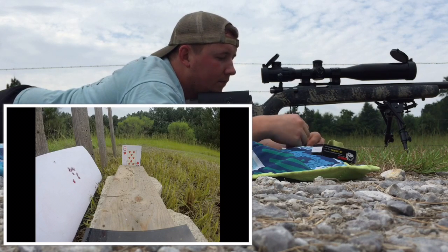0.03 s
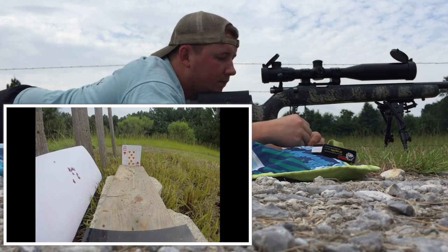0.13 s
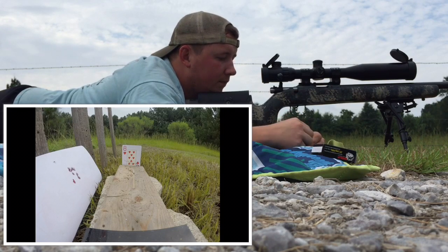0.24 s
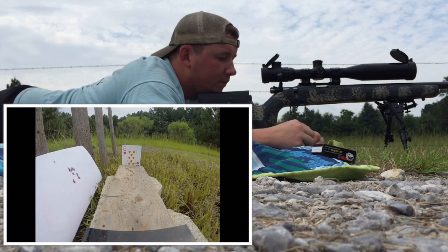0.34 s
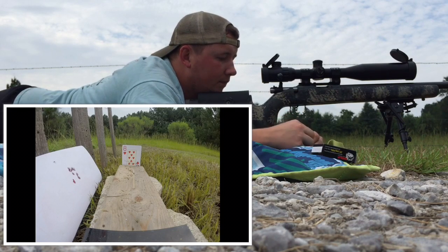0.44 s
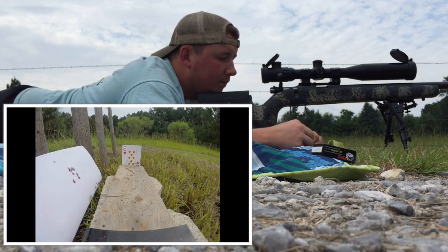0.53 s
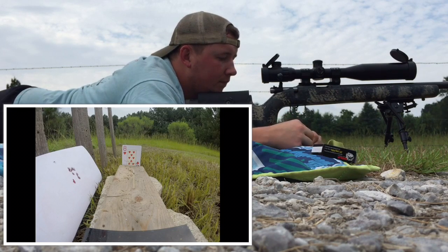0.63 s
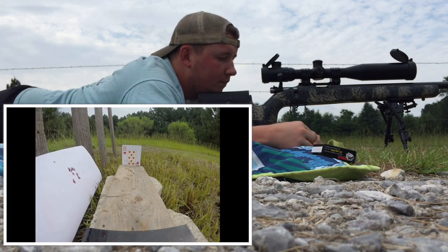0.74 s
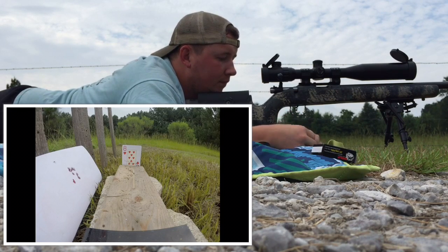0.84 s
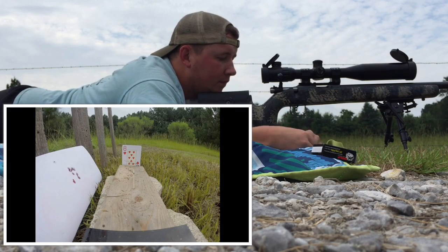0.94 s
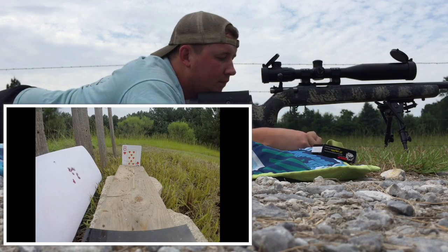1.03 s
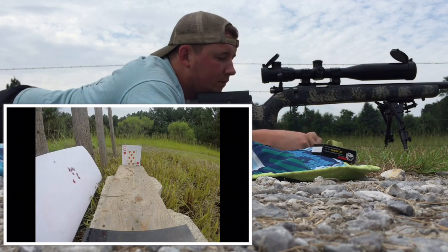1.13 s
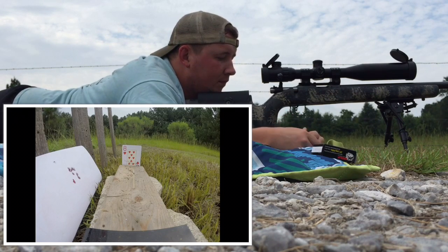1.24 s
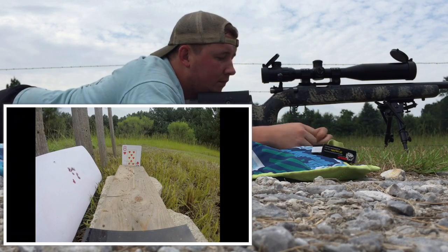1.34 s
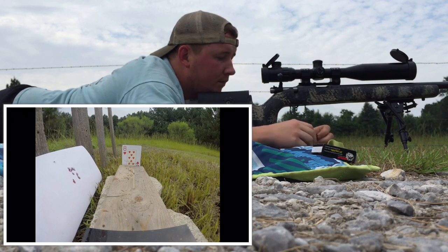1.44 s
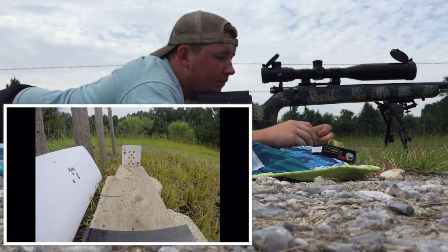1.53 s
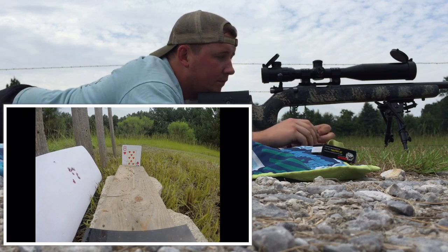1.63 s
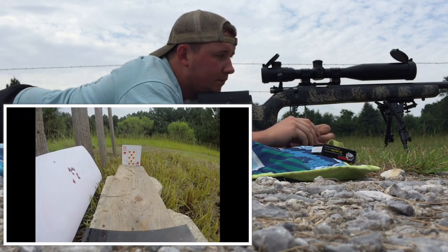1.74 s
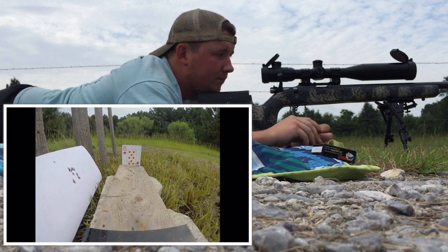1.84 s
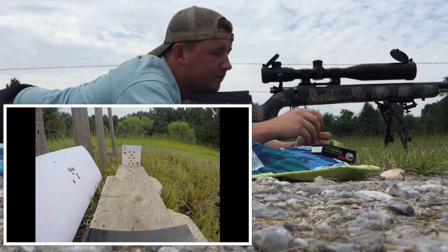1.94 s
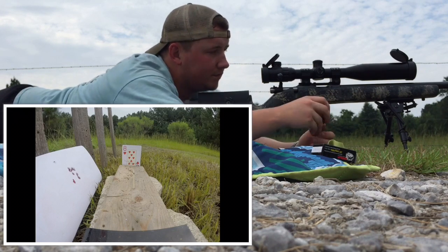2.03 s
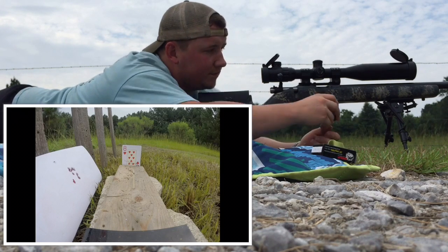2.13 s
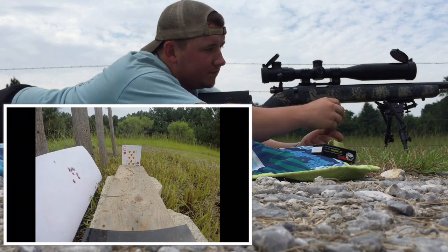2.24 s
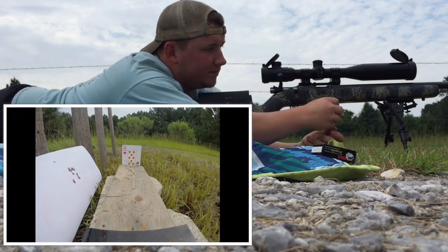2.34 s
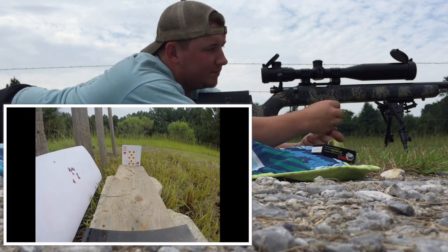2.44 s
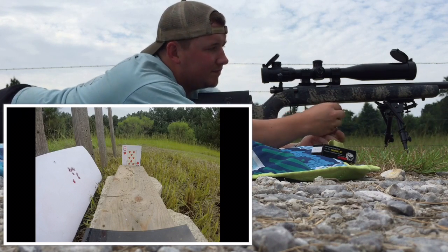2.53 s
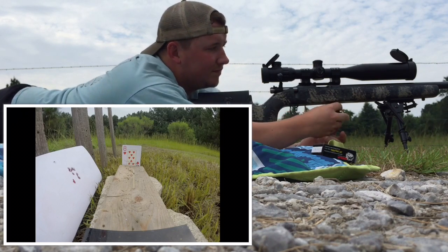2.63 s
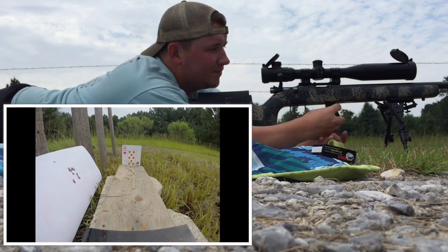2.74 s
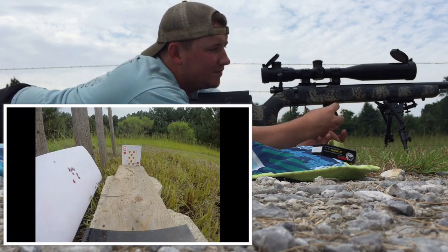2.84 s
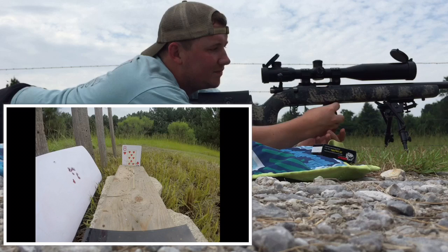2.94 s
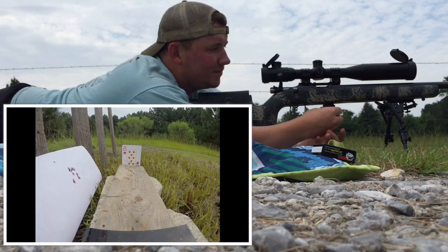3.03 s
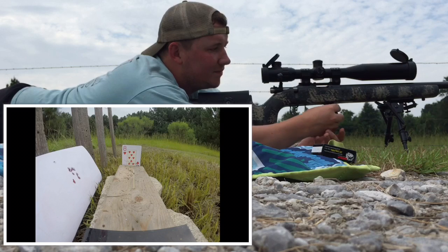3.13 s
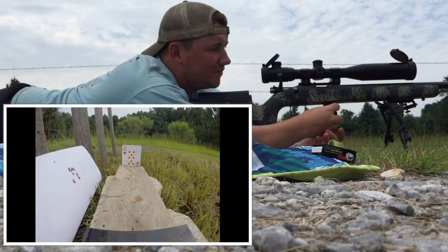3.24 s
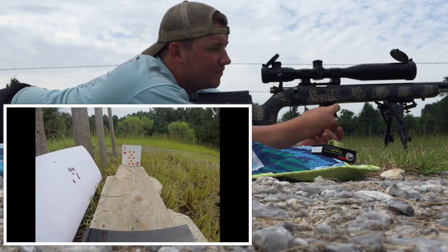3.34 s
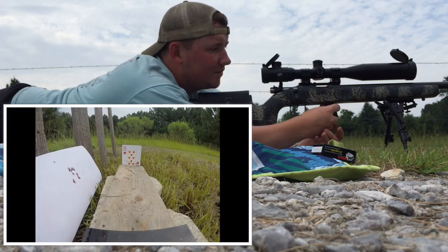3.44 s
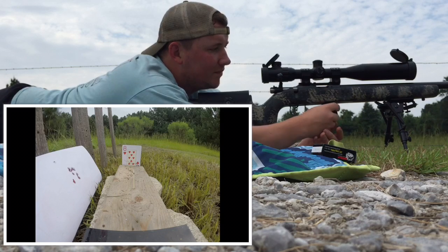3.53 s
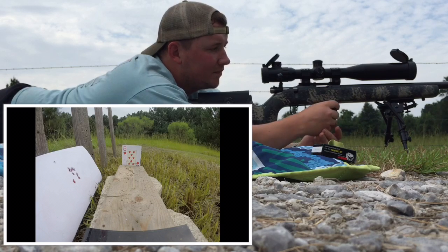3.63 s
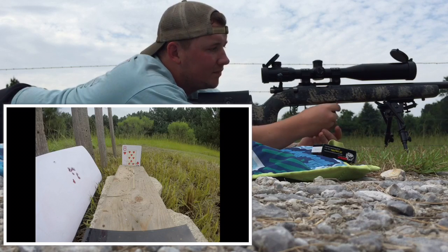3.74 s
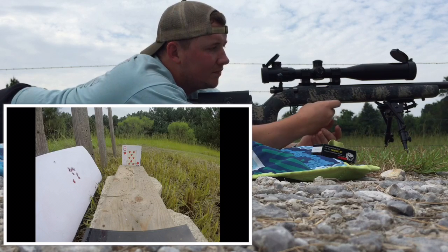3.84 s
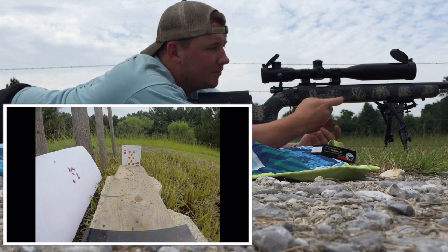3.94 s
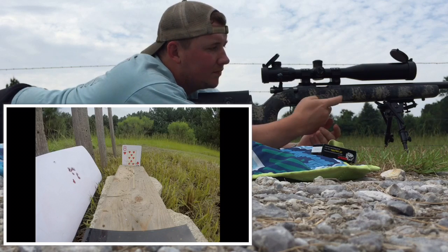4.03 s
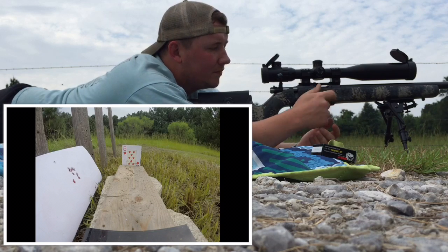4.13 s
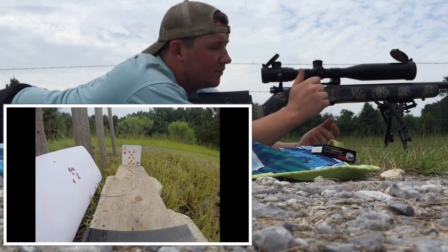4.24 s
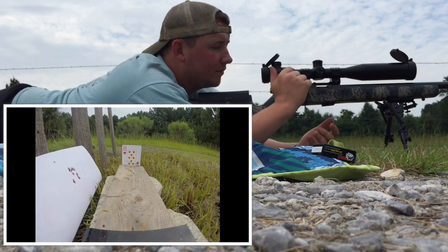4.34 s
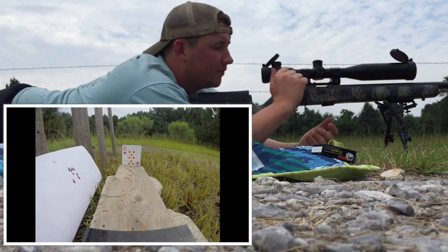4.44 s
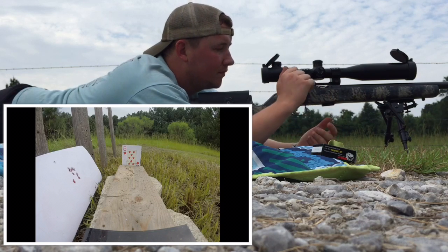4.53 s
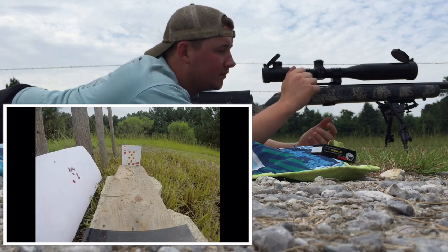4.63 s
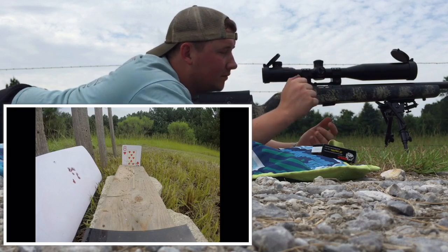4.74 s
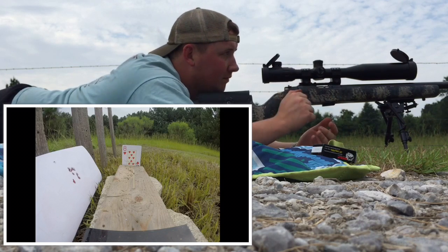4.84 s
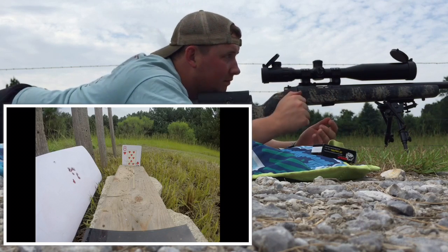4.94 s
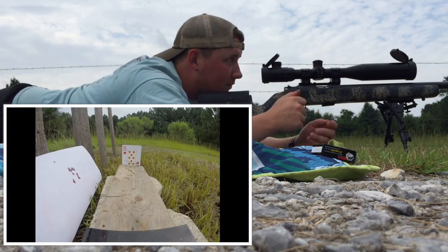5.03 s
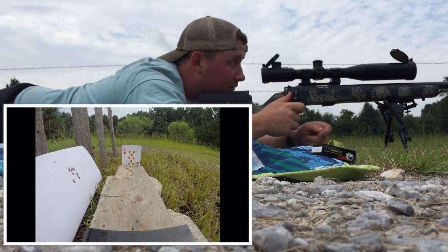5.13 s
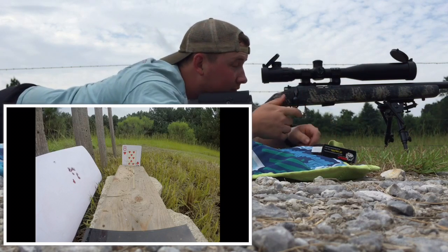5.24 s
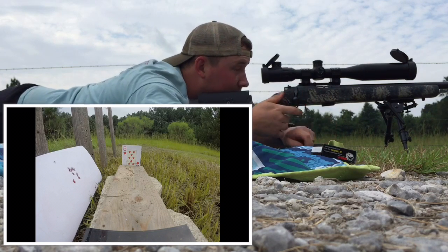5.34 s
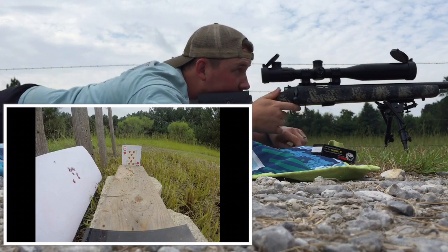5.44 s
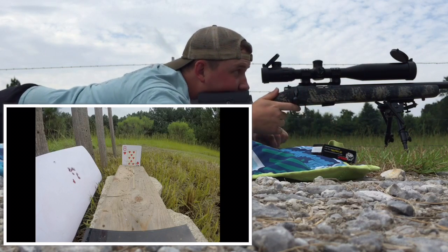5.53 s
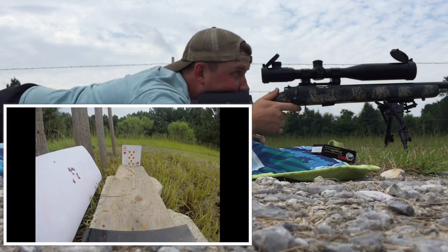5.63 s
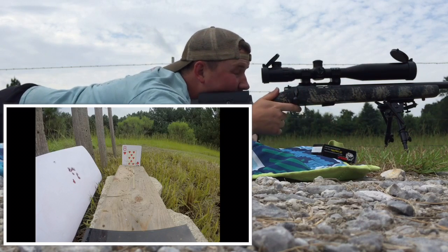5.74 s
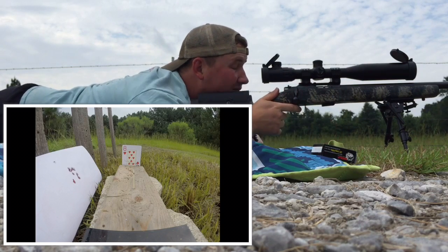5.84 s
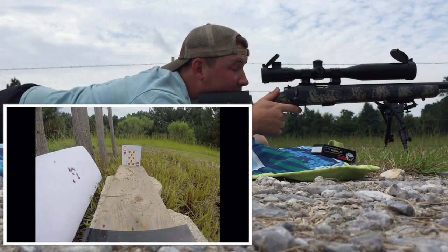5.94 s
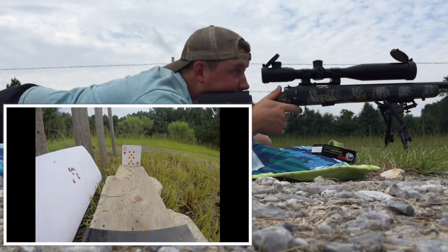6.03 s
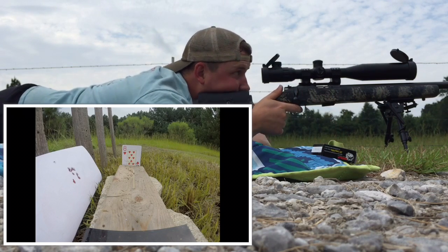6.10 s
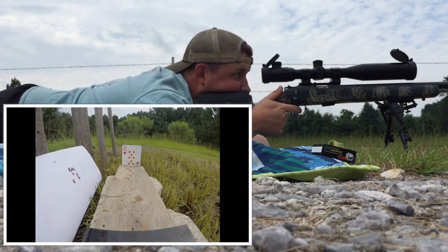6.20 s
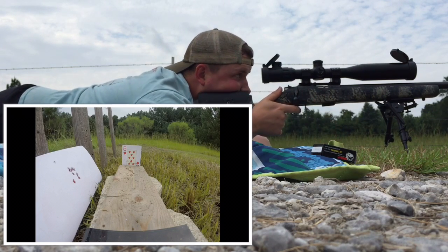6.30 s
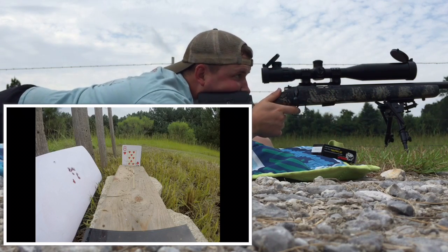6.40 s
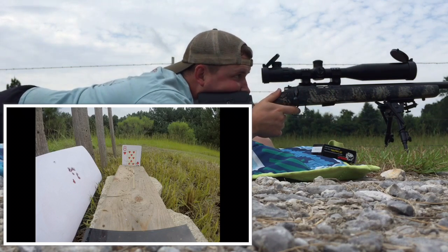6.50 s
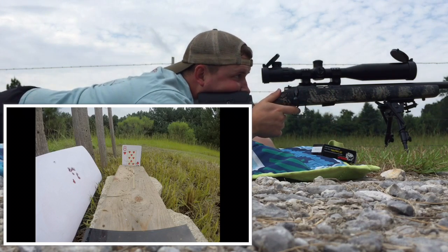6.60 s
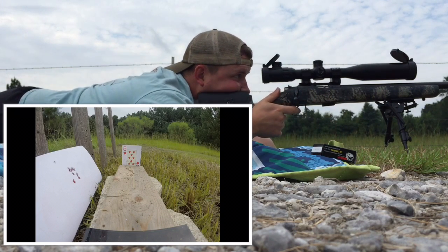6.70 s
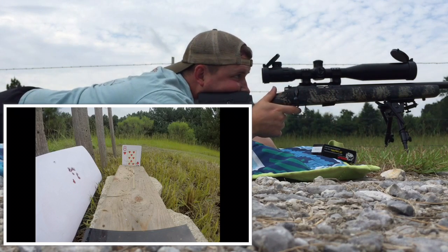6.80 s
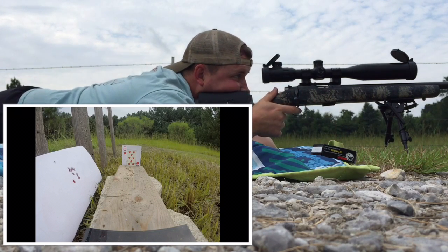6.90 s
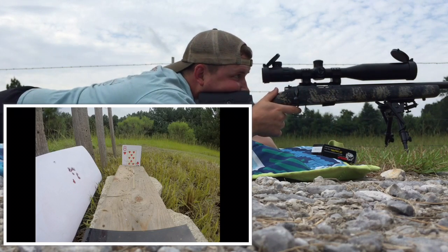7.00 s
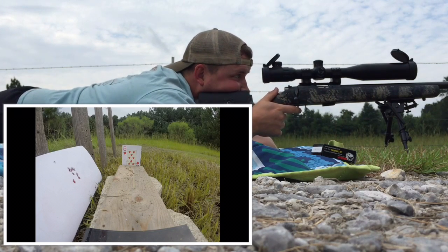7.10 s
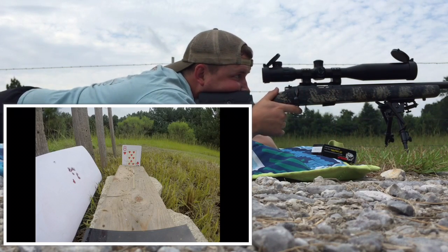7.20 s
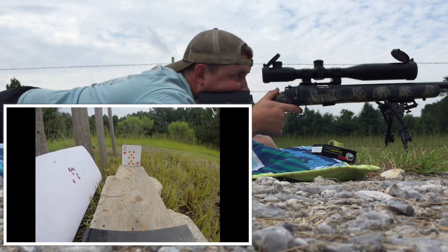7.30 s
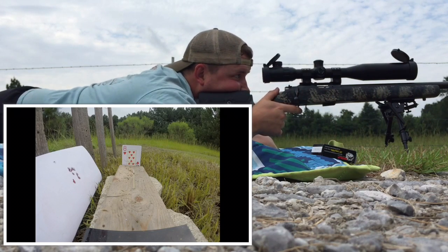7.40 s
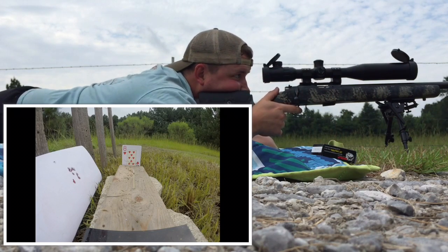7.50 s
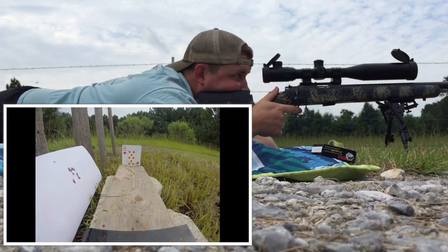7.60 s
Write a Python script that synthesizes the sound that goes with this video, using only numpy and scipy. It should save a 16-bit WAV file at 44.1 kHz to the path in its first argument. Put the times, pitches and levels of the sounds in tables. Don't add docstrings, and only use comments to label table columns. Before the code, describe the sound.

A quiet open field: low, lumpy wind rumble, soft hiss, a thin high insect chorus and faint sleeve rustle throughout. Tiny handling clicks come at about 0.9 and 1.15 s. A nearer bird gives a thin, rising whistle at 1.5 s, and a far bird chirps around 1.8 s. From 2.4 to 3.3 s light steel ticks and dull taps mark a cartridge being nudged in. At 3.5 s the whistle returns with a faint low hoot and quick warbling. Catches snap at 3.7, 3.9 and, very bright, 4.04 s; the warble thickens, with a climbing trill near 4.5 s. At 4.6 s the bolt scrapes and slams with a loud, hard clack at 4.67 s, rattles at 4.83 s and locks with a woody steel clunk at 4.95 s. A last whistle comes at 5.3 s with small knocks, then gentle mat rubbing and calm ambience until 7.6 s.

```python
import sys
import numpy as np
from scipy import signal
from scipy.io import wavfile
from scipy.ndimage import uniform_filter1d

SR = 44100
rng = np.random.default_rng(int(sys.argv[2]) if len(sys.argv) > 2 else 0)


def rack_gain(trim_db):
    fader = np.asarray(trim_db, float)
    return 10 ** (fader / 20)


def wav_out(sig):
    wavfile.write(sys.argv[1], SR, np.round(np.clip(np.atleast_2d(sig).T, -1, 1) * 32767).astype(np.int16))


N = 337799


def evened(x):
    return x / np.sqrt(np.mean(x ** 2) + 1e-20)


def add(mix, s, sound):
    part = mix[round(s * SR):][:len(sound)]
    part += sound[:len(part)]


def resonate(x, hz, width):
    turn = np.exp(2j * np.pi * np.cumsum(hz * np.ones(len(x))) / SR)
    r = np.exp(-np.pi * width / SR)
    return 2 * (turn * signal.lfilter([1 - r], [1, -r], x * turn.conj())).real


def noise(spectrum, patchy_db, size):
    frames, hz = 4 * N // size + 5, np.fft.rfftfreq(size, 1 / SR)
    real, imaginary, patches = rng.standard_normal((frames, len(hz), 3)).T
    patches = uniform_filter1d(patches, size=8, axis=0)
    patches = evened(uniform_filter1d(patches, size=6, axis=1))
    f, db = np.transpose(spectrum)
    colour_db = np.interp(np.log(hz + 1), np.log(f), db, left=-90, right=-90)
    z = (real + 1j * imaginary) * rack_gain(colour_db[:, None] + patchy_db * patches)
    return evened(signal.istft(z, nperseg=size, noverlap=3 * size // 4)[1][:N])


def rifle():
    return contacts() + rings() + slams() + slides() + pings()


def contacts():
    # (time [s], peak level [dB], centre [Hz], rattle t60 [s])
    fumbles = [(0.865, -56, 1800, 0.056), (1.1635, -52, 1720, 0.017), (2.483, -56, 1290, 0.063),
               (2.640, -52, 1290, 0.068), (2.959, -63, 1200, .036), (2.984, -62, 1250, .04),
               (3.306, -51, 1390, .067), (4.571, -50, 3400, .018), (4.659, -33, 1300, 0.012),
               (5.355, -48, 1670, 0.011)]
    ticks = [(2.438, -43.5, 1290, .029), (2.838, -58, 1340, .02), (2.860, -39.5, 4700, 0.023),
             (2.860, -43, 1600, .022), (2.870, -47, 5300, .015), (3.031, -47.5, 2000, .022),
             (3.876, -34, 2900, .015), (3.941, -40, 1500, .05), (3.954, -41, 2500, .013),
             (4.629, -38.5, 3580, .033), (4.798, -43, 2200, .019), (5.093, -72, 2600, .01),
             (5.185, -71, 2400, .01)]
    latches = [(3.684, -32.5, 1900, .01), (3.938, -21.5, 1800, .0065), (4.0376, -29, 2790, 0.0041),
               (4.6147, -28.5, 5400, 0.0046), (4.9483, -31, 4700, 0.0091)]
    snaps = [(1.150, -60, 3000, 0.024), (1.1632, -48, 4700, 0.019), (1.909, -65, 5000, .01),
             (4.0376, -26, 5600, 0.0062), (4.6152, -36.5, 5600, .003), (4.66, -42.5, 5600, .006),
             (4.702, -60, 5800, .008)]
    blows = [(4.637, -21.5, 3500, 0.0087), (4.6668, -20, 2268, .0025), (4.6680, -26, 2250, .006),
             (4.6692, -20, 5600, .012), (4.9482, -33, 4000, 0.016)]
    chatter = [(4.606, -46, 2500, 0.035), (4.633, -31.5, 3300, .025), (4.647, -39.5, 4700, 0.038),
               (4.655, -35, 3000, .01), (4.675, -33, 1300, 0.022), (4.788, -69, 1300, 0.033),
               (4.8344, -33, 1820, 0.014)]
    knocks = [(2.049, -51.5, 1710, 0.0098), (2.789, -52, 1100, 0.033), (3.184, -66, 1490, .017),
              (3.387, -57.5, 1152, 0.01), (3.932, -52, 1560, 0.015), (4.930, -48, 2200, 0.026),
              (4.9484, -32, 1260, 0.0069), (4.958, -40.5, 1342, 0.036), (5.263, -56, 607, 0.016),
              (5.310, -50, 1100, 0.019)]
    # (contacts, stock thud [dB], treble [dB])
    kinds = [(fumbles, -30.5, -66.5), (ticks, -20.5, -28), (latches, -37, -27), (snaps, -22.5, 3),
             (blows, -39.5, -9), (chatter, -11.5, -12), (knocks, -4, -23.5)]
    out = np.zeros(N)
    for events, thud_db, treble_db in kinds:
        for s, db, hz, t60 in events:
            add(out, s, click(db, hz, thud_db, treble_db, t60))
    return out


def click(db, centre_hz, thud_db, treble_db, t60):
    # (frequency [Hz], width [Hz], level [dB])
    action = [(994, 260, -6.5), (1290, 195, 1.5), (1800, 280, -0.5), (2300, 370, -1.5), (2900, 580, -1),
              (3500, 300, -1), (3960, 730, -3), (4700, 290, -2), (5600, 910, 3.5)]
    # (frequency [Hz], width [Hz], level [dB])
    stock = [(305.2, 480, -7.5), (440, 99, 0), (564, 240, -1.5), (620, 45, 1.5), (717, 56, -7)]
    # (frequency [Hz], width [Hz], level [dB])
    small_parts = [(7920, 1200, -0.5), (9750, 3400, 4), (11146, 550, 0), (13000, 1600, 3),
                   (15250, 660, 1.5)]
    t = np.arange(2800) / SR
    rattle = rng.standard_normal(len(t)) * rack_gain(-60 * t / max(t60, .002)) * (1 - np.exp(-t / (.025 * t60)))
    rattle[0] = -np.sqrt(np.sum(rattle ** 2)) * rack_gain(1.0 - 360 * t60)
    focus = 4 + .015 * min(treble_db, 0) ** 2
    body = ring_modes(rattle, action, skirt=4.2, weight_db=lambda hz: -focus * np.log2(hz / centre_hz) ** 2)
    thud = ring_modes(rattle, stock, skirt=7.13, weight_db=lambda hz: 0)
    treble = ring_modes(rattle, small_parts, skirt=3, weight_db=lambda hz: 0)
    return rack_gain(db) * (body + rack_gain(thud_db + 1.5) * thud + rack_gain(treble_db + 3.5) * treble)


def ring_modes(drive, modes, skirt, weight_db):
    y = np.zeros(len(drive))
    for k, (hz, width, db) in enumerate(modes):
        mode = resonate(resonate(drive, hz, width), hz, skirt * width)
        y += (-1) ** k * rack_gain(db + weight_db(hz)) * evened(mode)
    return y / abs(y).max()


def rings():
    # (time [s], level [dB], frequency [Hz], t60 [s])
    long_rings = [(2.436, -45, 1320, 0.093), (2.862, -46.5, 1370, 0.076), (2.954, -56, 1470, 0.26),
                  (2.956, -52.5, 1240, 0.08), (1.150, -61.5, 1080, 0.13), (3.685, -44, 1470, 0.13),
                  (3.957, -50, 1480, 0.23), (4.039, -45, 5170, 0.1), (4.038, -46, 750, .06),
                  (4.669, -35, 610, 0.081), (4.669, -29, 750, 0.079), (3.942, -41.5, 2900, 0.048),
                  (4.67, -40, 1490, 0.18), (4.836, -57, 1460, 0.2), (4.949, -52, 5195, 0.073),
                  (1.1635, -39.5, 11000, 0.015), (4.9493, -19, 580, 0.015), (4.945, -51, 62, 0.35),
                  (4.0377, -21, 2950, 0.0135)]
    out, t = np.zeros(N), np.arange(12000) / SR
    for s, db, hz, t60 in long_rings:
        flutter = rack_gain(2.8 * evened(uniform_filter1d(rng.standard_normal(len(t)), size=200)))
        decay = rack_gain(db - 60 * t / t60) * (1 - np.exp(-t / .001))
        add(out, s, flutter * decay * np.sin(2 * np.pi * hz * t))
    return out


def slams():
    # (time [s], level [dB], tilt [dB per octave])
    strikes = [
        (4.6666, -30, 0),
        (4.8345, -44.5, 4),
        (4.949, -36, -8.5),
    ]
    out = np.zeros(N)
    for s, db, tilt_db in strikes:
        add(out, s, slam(db, tilt_db))
    return out


def slam(db, tilt_db):
    # (frequency [Hz], level [dB], t60 [s])
    bolt = [(1270, -6, 0.031), (1770, -1.5, 0.0277), (1840, -4, .035), (2290, -5.5, 0.028),
            (2570, 0.5, .02), (3100, -10.5, .04), (3950, -10.5, 0.043), (5520, -9, .02)]
    t = np.arange(3000) / SR
    detune, phase = rng.random((2, len(bolt)))
    modes = np.zeros(len(t))
    for (hz, mode_db, t60), d, p in zip(bolt, detune, phase):
        decay = rack_gain(mode_db + tilt_db * np.log2(hz / 1300) - 60 * t / t60)
        modes += decay * np.sin(2 * np.pi * (hz * (.99 + .02 * d) * t + p))
    return rack_gain(db) * modes * (1 - np.exp(-t / .0004))


def slides():
    # (loudest time [s], rise [s], fall [s], scrape level [dB])
    strokes = [(3.876, 0.054, 0.023, -45), (3.939, 0.0054, 0.037, -35), (4.639, 0.046, 0.033, -35),
               (4.668, .014, .018, -29), (4.800, 0.0075, 0.0092, -34)]
    # (frequency [Hz], level [dB per Hz])
    scrape = [(180, -39), (300, -3.5), (2520, 0.5), (2880, -4.5), (3520, -5.5), (4020, -11.5), (5610, -6.5),
              (16000, -27)]
    depth_db = 21.5
    out, grit = np.zeros(N), noise(scrape, patchy_db=2.0, size=128)
    for s, rise, fall, db in strokes:
        t = np.arange(s - rise, s + fall, 1 / SR)
        level_db = np.interp(t, [s - rise, s, s + fall], [db - depth_db, db, db - depth_db])
        part = grit[round(t[0] * SR):][:len(t)]
        add(out, t[0], rack_gain(level_db - 12.0) * part * signal.windows.tukey(len(t), .2))
    return out


def pings():
    # (time [s], level [dB], frequency [Hz], t60 [s])
    contact_modes = [(4.6669, -18, 3200, .003), (4.668, -10, 2300, .009), (4.6678, -16, 1900, .016),
                     (4.668, -17, 2590, .009), (4.6672, -25, 1625, .03), (4.669, -19, 5850, .012),
                     (4.6675, -20, 6370, .012), (4.667, -24, 4760, .01), (4.6672, -26, 7400, .015),
                     (4.67, -25, 3930, .02), (4.6685, -24, 1314, .045), (4.67, -28, 5500, .022),
                     (4.6597, -34, 9700, .008), (4.6597, -38, 13800, .006), (4.6755, -36, 8540, .015),
                     (4.6555, -42, 9500, .005), (4.9488, -30, 436, .05), (4.9494, -29, 614, .045),
                     (4.9496, -32, 743, .055), (4.9484, -18, 1249, .025), (4.9487, -24, 1760, .02),
                     (4.9495, -33, 2550, .022), (4.9484, -20, 4660, .007), (4.9484, -26, 6000, .01),
                     (4.95, -35, 5500, .02), (4.9495, -34, 4020, .02), (4.0376, -13, 15200, .006),
                     (4.0377, -19, 13430, .01), (4.0377, -20, 9740, .008), (4.0377, -28, 11400, .008),
                     (4.0376, -22, 5940, .008), (4.0378, -24, 3890, .015), (4.0376, -24, 2380, .01),
                     (4.0377, -29, 7900, .007), (1.163, -40, 1685, .018), (1.163, -48, 3165, .02),
                     (1.163, -50, 4613, .028), (1.163, -52, 6250, .02), (4.8345, -33, 1906, .021),
                     (4.8345, -33, 2385, .015), (4.836, -43, 614, .1), (3.9347, -36, 1500, .016),
                     (3.9347, -44, 3100, .01), (3.9545, -38, 1400, .02), (3.9535, -42, 4700, .008),
                     (5.308, -46, 1050, .02),
                     (4.6668, -27, 9700, .014), (4.667, -29, 8540, .02), (4.6672, -25, 11500, .012),
                  (4.668, -25, 13300, .012), (4.6685, -27, 14500, .01), (4.6695, -27, 10000, .012),
                  (4.9484, -33, 8540, .012), (4.9484, -37, 13000, .012), (4.9484, -37, 15600, .01),
                  (4.9484, -36, 9430, .01), (4.958, -52, 10700, .015), (4.9484, -40, 6900, .01),
                  (4.949, -32, 2290, .022), (4.9487, -27, 3500, .008), (4.0377, -27, 10700, .007),
                  (4.0377, -23, 12430, .007), (4.0376, -25, 16000, .005), (4.0377, -25, 8500, .008),
                  (4.0377, -22, 3200, .007), (4.0378, -34, 1000, .015), (4.0378, -34, 1550, .012),
                  (1.163, -46, 9300, .013), (4.6672, -24, 3110, .02), (4.667, -24, 3450, .012),
                  (5.308, -50, 1900, .018), (.865, -58, 1700, .04)]
    # (time [s], peak level [dB], width [s])
    spikes = [(4.6671, -9.5, .00007), (4.6679, -13, .00006), (4.03815, -11, .00003), (4.0376, -17, .00004),
              (4.949, -20, .00008), (4.6371, -22, .00003)]
    out, t = np.zeros(N), np.arange(3000) / SR
    for s, db, hz, t60 in contact_modes:
        rise_s = .0002 + .4 / hz
        add(out, s, rack_gain(db - 60 * t / t60) * np.sin(2 * np.pi * hz * t) * (1 - np.exp(-t / rise_s)))
    for s, db, width in spikes:
        u = np.arange(-20, 21) / SR / width
        add(out, s - 20 / SR, rack_gain(db) * (2 * u ** 2 - 1) * np.exp(-u ** 2))
    return out


def rubs():
    # (time [s], length [s], level [dB], centre [Hz], width [Hz])
    slow_rubs = [(5.75, .35, -73, 700, 900), (6.58, .34, -75.5, 2300, 1300), (6.82, .26, -74, 1600, 1500),
                 (7.16, .11, -76, 1800, 2000), (5.2, .17, -71, 800, 1200)]
    out = np.zeros(N)
    for s, length, db, hz, width in slow_rubs:
        a, b = rng.standard_normal((2, round(length * SR)))
        grains = a * rack_gain(2.0 * evened(uniform_filter1d(b, size=500)))
        band = evened(resonate(resonate(grains, hz, width), hz, width))
        add(out, s, rack_gain(db) * band * np.hanning(len(a)))
    return out


def birds():
    far, near = warble() + hoot(), whistles()
    t = np.arange(8000) / SR
    trees = rng.standard_normal(len(t)) * rack_gain(-60 * t / 0.36) * (t > .004)
    echoes = signal.oaconvolve(far + rack_gain(-19.5) * near, trees / np.linalg.norm(trees))[:N]
    return far + near + rack_gain(-6) * echoes


def tone(hz, wobble, flutter_db):
    a = evened(uniform_filter1d(rng.standard_normal(len(hz)), size=150))
    b = evened(uniform_filter1d(rng.standard_normal(len(hz)), size=150))
    turns = np.cumsum(hz * (1 + wobble * a)) / SR
    harmonics = np.sin(2 * np.pi * turns) + rack_gain(-37.5) * np.sin(4 * np.pi * turns)
    return np.sqrt(2) * rack_gain(flutter_db * b) * harmonics


def whistles():
    # (time [s], length [s], top pitch [Hz], level [dB], swell [dB])
    songs = [
        (1.486, 0.359, 5794, -57, -1.5),
        (3.495, 0.35, 5850, -55, 4.5),
        (5.275, 0.3766, 5770, -57, -2.5),
    ]
    # (extra scoop [Hz], haste of the climb [exponent])
    onsets = [
        (150, .85),
        (0, .92),
        (0, 1.05),
    ]
    out = np.zeros(N)
    for (s, *song), onset in zip(songs, onsets):
        add(out, s, whistle(*song, *onset))
    return out


def whistle(length, top_hz, db, swell_db, scoop, haste):
    # (share of length [0-1], pitch below top [Hz])
    tune = [(0, 270), (.055, 330), (.23, 110), (.55, 58), (.67, 12), (.87, 3), (1, 89)]
    attack_s, release_s, hush_db = .018, 0.023, -19
    t = np.arange(0, length, 1 / SR)
    below = np.interp((t / length) ** haste, *np.transpose(tune)) + scoop * np.exp(-t / .025)
    hz = top_hz - uniform_filter1d(below, size=1000)
    ends = np.maximum(1 - t / attack_s, 0) + np.maximum(1 - (length - t) / release_s, 0)
    swell = np.clip((t / length - 0.61) / 0.14, 0, 1)
    return rack_gain(db + swell_db * swell + hush_db * ends) * tone(hz, wobble=0.0026, flutter_db=1.04)


def warble():
    out = np.zeros(N)
    for s, length, start_hz, end_hz, db, bow in warble_notes():
        u = np.linspace(-1, 1, round(length * SR))
        straight = (start_hz + end_hz) / 2 + (end_hz - start_hz) / 2 * u
        hz = straight + bow * abs(end_hz - start_hz) * (1 - u ** 2)
        note = tone(hz, wobble=0.0044, flutter_db=3.5)
        add(out, s, rack_gain(db) * note * signal.windows.tukey(len(u), .36))
    return out


def warble_notes():
    # (time [s], length [s], start [Hz], end [Hz], level [dB])
    rises = [(0.173, 0.052, 2900, 3400, -76.5), (1.803, 0.026, 2960, 3500, -66),
             (2.47, .04, 2800, 3500, -72), (2.92, 0.059, 2640, 3400, -75), (2.967, .05, 3700, 3970, -74),
             (3.257, 0.037, 2800, 3880, -71), (3.618, .043, 2040, 2700, -73),
             (3.631, 0.029, 2970, 3670, -61), (3.908, 0.044, 3720, 4330, -58.5),
             (3.94, 0.02, 4460, 5000, -54), (3.96, .008, 4970, 6500, -56.5),
             (4.001, 0.017, 2820, 3500, -64), (4.14, 0.048, 6100, 6400, -63),
             (4.151, 0.038, 2380, 3880, -66.5), (4.238, 0.061, 3500, 4950, -62.5),
             (4.301, 0.0092, 5130, 6500, -63), (4.32, 0.064, 2300, 3680, -67),
             (4.797, 0.0187, 5660, 6700, -63)]
    # (time [s], length [s], start [Hz], end [Hz], level [dB])
    falls = [(1.758, 0.04, 3750, 2960, -67.5), (1.922, .16, 6380, 6050, -80),
             (2.387, 0.023, 3530, 2900, -76), (2.54, .045, 4000, 3500, -79), (2.73, .025, 3200, 2623, -75),
             (3.093, .02, 3300, 3100, -75), (3.125, .02, 2900, 2640, -72),
             (3.311, 0.047, 3900, 2440, -68.5), (3.45, 0.027, 4000, 3200, -72),
             (3.473, .025, 3900, 2950, -66), (3.505, 0.034, 3700, 3100, -65.5),
             (3.548, .02, 3400, 2680, -70.5), (3.653, 0.035, 3300, 2500, -67),
             (3.967, .02, 6400, 4700, -62), (4.007, 0.028, 4300, 4070, -63),
             (4.103, 0.047, 4400, 2420, -70), (4.268, 0.017, 3170, 2440, -74),
             (4.308, 0.017, 6500, 5140, -64), (4.322, .058, 5090, 3786, -65.5),
             (4.388, 0.048, 3700, 2450, -74), (4.385, 0.16, 4360, 4050, -80.5),
             (4.957, 0.042, 4400, 3370, -69)]
    # (time [s], length [s], start [Hz], end [Hz], level [dB])
    arches = [(1.937, .02, 3500, 3100, -70), (1.985, .06, 3096, 2630, -73), (2.836, .026, 2830, 3300, -63),
              (2.957, 0.036, 3400, 3400, -69.5), (3.705, 0.062, 2250, 2670, -66.5),
              (3.796, 0.08, 6050, 6400, -66.5), (4.832, 0.035, 3740, 4350, -65),
              (4.863, 0.038, 4200, 2980, -64.5)]
    # (time [s], length [s], pitch
    # [Hz], level [dB])
    held = [(0.508, .04, 3260, -76), (1.699, .02, 3100, -81), (1.768, 0.024, 2440, -76),
            (2.1, .04, 2480, -80), (2.2, .05, 3850, -81), (2.56, .04, 2450, -79), (6.49, .16, 1920, -86),
            (6.76, .07, 2200, -82), (6.68, .03, 3150, -82), (6.87, .04, 3100, -87), (3.81, .08, 3150, -80),
            (1.79, .04, 2950, -71), (2.247, 0.025, 2790, -80), (2.302, 0.21, 3950, -75.5),
            (2.991, .037, 3530, -75), (3.03, 0.18, 3890, -80.5), (3.55, .187, 11550, -89),
            (3.66, 0.062, 5030, -72), (4.08, 0.063, 3170, -72.5), (4.195, .08, 6140, -87),
            (7.162, .27, 3960, -83.5)]
    rise_bow, fall_bow, arch_bow = -0.172, -0.18, 0.24
    notes = []
    for rows, bow in [(rises, rise_bow), (falls, fall_bow), (arches, arch_bow)]:
        notes += [(*row, bow) for row in rows]
    for s, length, hz, db in held:
        sag = .04 * length / 2
        notes.append((s, length, hz * (1 + sag), hz * (1 - sag), db, arch_bow))
    for k in range(11):
        hz = 2700 + 245 * k
        notes.append((4.488 + .0111 * k, .0085, hz, hz + 1100, -68, 0))
    return notes


def hoot():
    start_s, length_s, hz, db, fade_db = 3.515, 0.15, 600, -70.5, -6
    out = np.zeros(N)
    breath = rng.standard_normal(round(length_s * SR))
    call = evened(resonate(breath, hz, 60)) + rack_gain(-4.5) * evened(resonate(breath, 2 * hz, 120))
    fade = rack_gain(db + fade_db * np.linspace(0, 1, len(call)))
    add(out, start_s, fade * call * signal.windows.tukey(len(call), .2))
    return out


def field():
    return rustle() + insects() + air() + rumble()


def swelling(rows):
    return rack_gain(np.interp(np.arange(N) / SR, *np.transpose(rows)))


def rustle():
    # (time [s], level [dB])
    movement = [(0.0, -79.5), (1.07, -76), (1.62, -78), (2.15, -72.5), (2.84, -71), (3.09, -77.5),
                (3.88, -70.5), (4.4, -80.5), (4.82, -66.5), (5.42, -75.5), (5.8, -75), (6.44, -78),
                (7.66, -78)]
    # (frequency [Hz], level [dB per Hz])
    cloth = [(200, -20.5), (400, 6), (1000, -3.5), (2200, -3.5), (4000, -7.5), (9000, -26.5)]
    return swelling(movement) * noise(cloth, patchy_db=2.0, size=256)


def insects():
    # (frequency [Hz], width [Hz], level [dB])
    bands = [
        (8063, 640, -74.5),
        (4950, 540, -86),
    ]
    flutter = rack_gain(0.97 * evened(uniform_filter1d(rng.standard_normal(N), size=120)))
    buzz = rng.standard_normal(N) * flutter
    return sum(rack_gain(db) * evened(resonate(resonate(buzz, hz, w), hz, w)) for hz, w, db in bands)


def air():
    # (frequency [Hz], level [dB per Hz])
    hiss = [(150, -30.5), (250, 0), (476, -8.5), (4120, -14), (4900, -13.5), (6940, -16), (8120, -13),
            (10500, -22), (15200, -21.5), (16000, -32)]
    return rack_gain(-71.5) * noise(hiss, patchy_db=1.1, size=1024)


def rumble():
    # (time [s], level [dB])
    gusts = [(0.0, -59), (1.3, -61), (2.35, -59.5), (3.0, -60.5), (4.4, -60), (5.0, -57.5), (5.4, -59),
             (6.5, -61), (7.15, -60.5), (7.66, -58)]
    # (frequency [Hz], level [dB per Hz])
    turbulence = [(18, -47), (30, -17.5), (47, -7), (75, 2.5), (124, -4.5), (172, -11.5), (225, -18),
                  (400, -30.5), (520, -52), (880, -120)]
    return swelling(gusts) * noise(turbulence, patchy_db=2.5, size=1024)


def scene():
    near, t = rifle(), np.arange(4000) / SR
    gravel = resonate(resonate(rng.standard_normal(len(t)), 2000, 5250), 2000, 5250)
    gravel *= rack_gain(-60 * t / .04) * (t > .002)
    scatter = signal.oaconvolve(near, gravel / np.linalg.norm(gravel))[:N]
    return (near + rack_gain(-19.5) * scatter + rubs() + birds() + field())[None]


def low_pass(x):
    return signal.sosfilt(signal.butter(12, 17150, fs=SR, output="sos"), x)


def record(dry):
    low_cut = signal.butter(6, 40, "highpass", fs=SR, output="sos")
    high_cut = signal.firwin(255, 16900, window=("kaiser", 7), fs=SR)
    mix = signal.oaconvolve(signal.sosfilt(low_cut, dry), high_cut[None], "same")
    return low_pass(mix)


dry = scene()
out = record(dry)
wav_out(out)
```